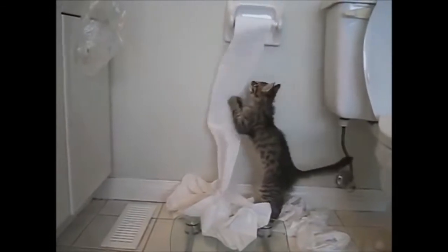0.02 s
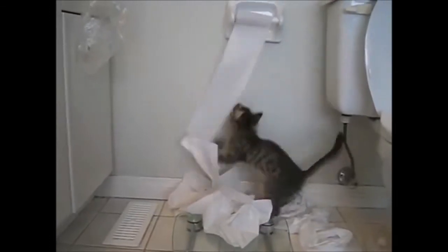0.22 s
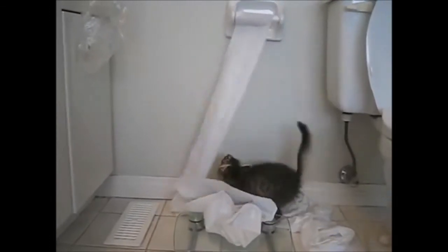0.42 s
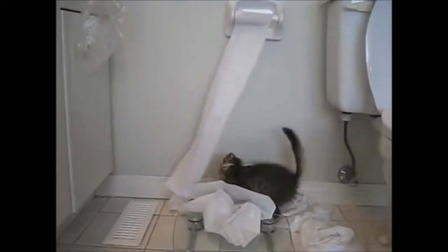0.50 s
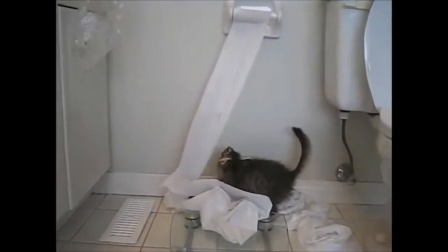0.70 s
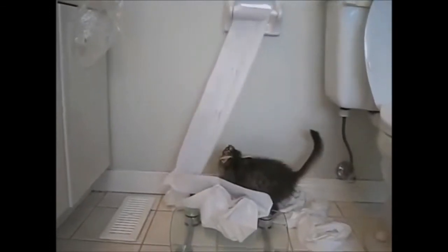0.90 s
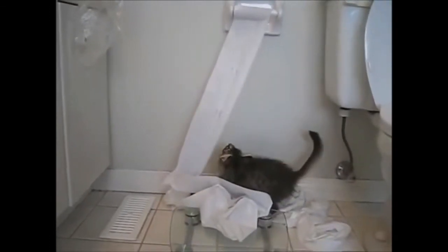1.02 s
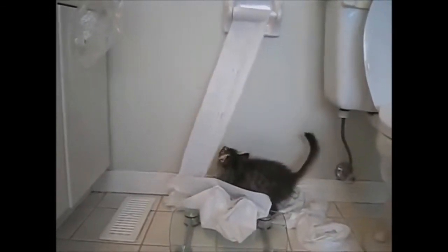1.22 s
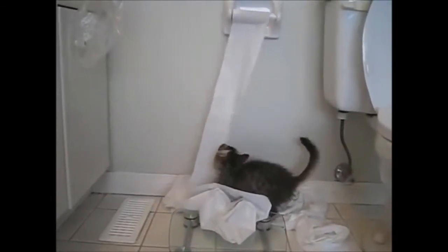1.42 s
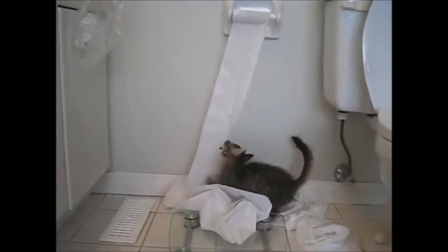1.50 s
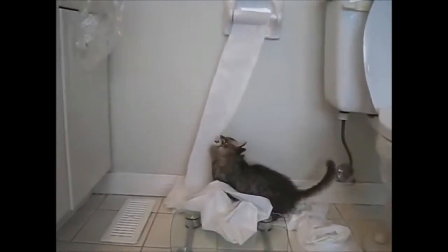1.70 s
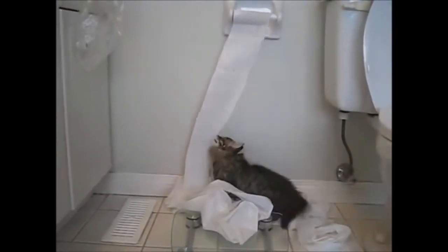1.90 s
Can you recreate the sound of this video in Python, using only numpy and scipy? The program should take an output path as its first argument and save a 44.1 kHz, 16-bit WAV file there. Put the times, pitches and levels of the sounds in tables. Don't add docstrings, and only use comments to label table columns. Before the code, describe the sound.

Quick hollow and hard clacks of a cardboard roll on its spindle, a burst of rustling paper and dull paw thuds, then low vent hum with slight paper crackles, in a small echoing bathroom on a small camera microphone.

```python
import sys
import numpy as np
from scipy import signal
from scipy.io import wavfile

SR = 44100
rng = np.random.default_rng(int(sys.argv[2]) if len(sys.argv) > 2 else 0)


def ratio(d):
    e = np.asarray(d, float) / 20
    return 10 ** e


def log_audio(samples):
    frames = np.atleast_2d(samples).T
    limited = np.clip(frames, -1, 1)
    pcm = np.round(limited * 32767).astype(np.int16)
    wavfile.write(sys.argv[1], SR, pcm)


N = 85995

# time [s], rustle level [dB], brightness [dB per octave].
CLAWED_MOTION = [
    (0, -47.5, -3.0),
    (.06, -54.5, -4),
    (.11, -45.5, -2.6),
    (.15, -43, 0.5),
    (.19, -42.5, -1.5),
    (.224, -46, 1.5),
]
# time [s], rustle level [dB], brightness [dB per octave].
YANKED_MOTION = [
    (.234, -37.5, -4.5),
    (.27, -38.5, 2),
    (0.294, -26.5, -0.65),
    (.35, -28.5, -0.1),
    (0.448, -33.5, 0.5),
    (0.474, -48, -2.5),
    (.68, -57.5, -0.5),
    (.72, -61, -1),
    (1.05, -96, 3.5),
]
# time [s], rustle level [dB], brightness [dB per octave].
SLACK_MOTION = [
    (1.215, -72.5, -0.24),
    (1.25, -52, 0.68),
    (1.27, -54.5, .6),
    (1.285, -49, 0.42),
    (1.325, -46, 0.58),
    (1.40, -60.5, -0.98),
    (1.5, -57.5, -1.1),
    (1.65, -58.5, -0.97),
    (1.95, -61, -.6),
]
# frequency [Hz], density [dB per Hz].
TAUT_COLOUR = [(88, -29), (150, -24), (601, -4), (790, -16), (960, -2.5), (1870, -6.5), (4000, -5),
               (12700, -15), (16000, -13)]
# frequency [Hz], density [dB per Hz].
SLACK_COLOUR = [(180, -44), (300, -20), (405, -6), (946, -4.5), (1320, -2.5), (4830, -4.5), (16000, -15)]
# time [s], peak [dB], pitch [Hz].
CREASE_SNAPS = [
    (1.168, -49.5, 1240),
    (1.28, -41, 3000),
    (1.483, -49, 3370),
    (1.621, -52, 3550),
    (1.631, -40, 4310),
    (1.693, -49.5, 2640),
    (1.848, -55, 1920),
]
# time [s], peak [dB], hollow-to-hard balance [dB],
# chatter length [s], hard ring [Hz].
ROLL_KNOCKS = [(.0005, -39, 1.5, 0.01, 4700), (0.0194, -31.5, -0.5, .004, 3880),
               (0.085, -23.5, 7, 0.0049, 4200), (0.097, -29, 11, 0.0014, 4000),
               (.131, -22.5, -8, 0.0035, 4050), (0.155, -30, -5, 0.0067, 3340),
               (0.185, -25.5, 4.5, 0.0034, 4300), (0.232, -22.5, -1, 0.0034, 4200),
               (0.235, -27, -0.5, 0.0024, 5000), (0.244, -21, 1.5, .004, 4950),
               (0.2607, -11, -2, .005, 3967), (0.279, -20, -2.5, 0.0051, 4580),
               (0.296, -20, -9.5, 0.0027, 4250), (0.3048, -10.5, -16, .003, 4040),
               (0.308, -13, -8, 0.0019, 2900), (0.3176, -14.5, -2.5, 0.0024, 4910),
               (0.337, -19, 2.5, 0.0046, 3500), (.345, -19.5, 3, 0.0039, 2950)]
# time [s], rattle level [dB].
ROLL_SPIN = [
    (0, -44.5),
    (.07, -47.5),
    (.1, -40),
    (.22, -48),
    (.24, -44),
    (.29, -34.5),
    (.33, -29),
    (.40, -33.5),
    (.50, -50),
]
# multiple of the hard ring, level [dB], t60 [s].
SPINDLE_MODES = [(.62, -11.5, .005), (.78, -19, .004), (1.001, -0.14, 0.015), (1.22, -3.5, .004),
                 (1.55, -8.5, .003), (2.1, -11, .002), (2.6, -15.5, 0.0022), (3.2, -30, .002)]
# frequency [Hz], level [dB], t60 [s].
TUBE_MODES = [(596, -10.5, 0.028), (960, -8.5, 0.042), (1086, -12, 0.029), (1335, -4.5, 0.034),
              (1404, -1.3, .04), (1738, -9, 0.044)]
# time [s], level [dB].
PAW_LANDINGS = [
    (.02, -54.5),
    (.10, -53),
    (0.199, -43.5),
    (.29, -39),
    (0.341, -43),
    (.39, -38.5),
    (0.459, -40.5),
    (.55, -47.5),
    (.74, -54),
]
# frequency [Hz], level [dB], t60 [s].
BOOM_MODES = [(96, -7.5, 0.14), (159.9, 0.8, 0.18), (213, -5.5, 0.11), (258, -6, 0.132), (419.7, -5, 0.12)]
# frequency [Hz], density [dB per Hz].
AIR_COLOUR = [(12, -41), (20, 7), (120, -5.5), (301, -5), (542, -12), (923, -7), (1440, -11), (7730, -18.5),
              (16000, -28.5)]
# frequency [Hz], width [Hz], level [dB rms].
VENT_TONES = [(306, 30, -67), (917.6, 40, -63.5), (1130, 53, -74.5), (7790, 35, -79.5)]

GRAINS_PER_S, GRAIN_SPREAD_DB, HISS_SHARE, PATCHY_DB = 5400, 2, 0.4, 2.5
CLUMP_DB, CLUMPS_PER_S = 2, 130
CREASE_CYCLES = 13
HOLLOW_DB, HARD_DB, TOUCHES_PER_S = -7.5, -2.5, 9000
BRIGHTER_DB_PER_DB = 0.7
TUBE_SOFT_HZ = 2200
KNOCK_FLOOR_HZ, KNOCK_TOP_HZ = 946, 12000
RATTLES_PER_S, RATTLE_SPREAD_DB, RATTLE_DB = 900, 2.2, -26.5
WOBBLE_DB_PER_DB = 0.7454
PAW_S, PAW_DB, PAW_FLOOR_HZ = .08, -24.5, 85
ROOM_T60_S, WALL_CUT_HZ, ROOM_DB, KNOCK_ROOM_DB = 0.44, 8950, -13, -5.5
AIR_DB, AIR_PATCHY_DB, VENT_WAVER_DB = -61.5, .4, .8


def rustle(motion, colour):
    level_db, bright_db = in_time(motion)
    fibres = [grains(GRAINS_PER_S, GRAIN_SPREAD_DB) + HISS_SHARE * rng.standard_normal(N) for _ in range(2)]
    clumped_db = level_db + CLUMP_DB * drift(CLUMPS_PER_S)
    return ratio(clumped_db) * banded(fibres, colour, PATCHY_DB, bright_db)


def creases():
    out = np.zeros(N)
    for s, db, hz in CREASE_SNAPS:
        click = np.zeros(N)
        click[int(s * SR)] = 1
        t60_s = CREASE_CYCLES / hz
        snap = ring(ring(click, hz, t60_s), hz, t60_s)
        out += ratio(db) * snap / snap.max()
    return out


def sheet():
    taut = rustle(CLAWED_MOTION + YANKED_MOTION, TAUT_COLOUR)
    slack = rustle(SLACK_MOTION, SLACK_COLOUR)
    return taut + slack + creases()


def knocks():
    out, span = np.zeros(N), SR // 8
    soften = signal.butter(2, TUBE_SOFT_HZ, fs=SR, output="sos")
    for s, db, hollow_db, length_s, ring_hz in ROLL_KNOCKS:
        touches = rng.choice([-1, 1], span) * (rng.random(span) < TOUCHES_PER_S / SR)
        chatter = touches * hump(0, length_s)[:span]
        soft = signal.sosfilt(soften, chatter)
        hard = np.zeros(span)
        for multiple, mode_db, t60_s in SPINDLE_MODES:
            brighter_db = BRIGHTER_DB_PER_DB * (db + 11) * max(multiple - 1, 0)
            hard += struck(chatter, multiple * ring_hz, mode_db + brighter_db, t60_s)
        hollow = sum(struck(soft, hz, mode_db, t60_s) for hz, mode_db, t60_s in TUBE_MODES)
        hard_gain = ratio(db - max(2 * hollow_db, 0) + HARD_DB)
        hollow_gain = ratio(db + min(2 * hollow_db, 0) + HOLLOW_DB)
        start = int(s * SR)
        out[start:start + span] += hard_gain * hard + hollow_gain * hollow
    band = signal.butter(2, [KNOCK_FLOOR_HZ, KNOCK_TOP_HZ], "band", fs=SR, output="sos")
    return signal.sosfilt(band, out)


def spin():
    stop = (ROLL_SPIN[-1][0] + 0.087, -90)
    spin_db, = in_time(ROLL_SPIN + [stop])
    rattle = np.zeros(N)
    for hz, db, t60_s in TUBE_MODES:
        wobble_db = WOBBLE_DB_PER_DB * (spin_db + 41) * np.log2(1400 / hz)
        clicks = ratio(db + wobble_db) * grains(RATTLES_PER_S, RATTLE_SPREAD_DB)
        rattle += ring(clicks, hz, t60_s)
    return ratio(spin_db + RATTLE_DB) * rattle


def paws():
    weight = sum(ratio(db + PAW_DB) * hump(s, PAW_S) for s, db in PAW_LANDINGS)
    boom = np.zeros(N)
    for hz, db, t60_s in BOOM_MODES:
        scuff = ratio(db) * weight * rng.standard_normal(N)
        boom += ring(scuff, hz, t60_s)
    return signal.sosfilt(signal.butter(2, PAW_FLOOR_HZ, "high", fs=SR, output="sos"), boom)


def bathroom(x):
    out, dull = np.zeros(N), np.exp(-2 * np.pi * WALL_CUT_HZ / SR)
    lags = (rng.uniform(.007, .03, 12) * SR).astype(int)
    for k, lag in enumerate(lags):
        loop, state = x.copy(), [0.]
        gain = np.exp(-np.log(1000) * lag / SR / ROOM_T60_S)
        for i in range(lag, N, lag):
            back, state = signal.lfilter([gain * (1 - dull)], [1, -dull], loop[i - lag:i], zi=state)
            loop[i:i + lag] += back[:N - i]
        out += (loop - x) * (-1) ** k
    return out


def vent():
    out = np.zeros(N)
    for hz, width_hz, db in VENT_TONES:
        t60_s = np.log(1000) / (np.pi * width_hz)
        tone = rms_one(ring(rng.standard_normal(N), hz, t60_s))
        out += ratio(db + VENT_WAVER_DB * drift(2.5)) * tone
    return out


def air():
    return ratio(AIR_DB) * banded(rng.standard_normal((2, N)), AIR_COLOUR, AIR_PATCHY_DB)


def hump(s, length_s):
    u = np.clip((np.arange(N) / SR - s) / length_s, 0, 1)
    return np.sqrt(u) * (1 - u)


def ring(clicks, hz, t60_s):
    r, w = np.exp(-np.log(1000) / (t60_s * SR)), 2 * np.pi * hz / SR
    return signal.lfilter([0, np.sin(w)], [1, -2 * r * np.cos(w), r * r], clicks + 1e-18)


def struck(chatter, hz, db, t60_s):
    rung = ring(chatter, hz, t60_s)
    return ratio(db) * rung / np.abs(rung).max()


def grains(per_s, spread_db):
    sizes = ratio(spread_db * np.minimum(rng.exponential(1, N), 4)) * rng.choice([-1, 1], N)
    return rms_one(sizes * (rng.random(N) < per_s / SR))


def banded(sources, spectrum, patchy_db, tilt_db=0):
    out, together = 0, drift(25)
    edges_hz = 20 * 2 ** np.arange(0, 9.9, .4)
    hz_at, db_at = np.transpose(spectrum)
    for k, (low, high) in enumerate(zip(edges_hz, edges_hz[1:])):
        band = signal.sosfilt(signal.butter(2, [low, high], "band", fs=SR, output="sos"), sources[k % 2])
        hz = np.sqrt(low * high)
        db = np.interp(np.log(hz), np.log(hz_at), db_at) + tilt_db * np.log2(hz / 3000)
        flicker_db = patchy_db * (0.28 * together + drift(36))
        out = out + ratio(db + flicker_db) * band
    return rms_one(out)


def drift(rate_hz):
    r = np.exp(-80 * np.pi * rate_hz / SR)
    noise = rng.standard_normal(N // 40 + 2002)
    slow = signal.lfilter([1], [1, -2 * r, r * r], noise)[2000:]
    return np.interp(np.arange(N) / 40, np.arange(len(slow)), rms_one(slow))


def in_time(rows):
    s, *columns = np.transpose(rows)
    return [np.interp(np.arange(N) / SR, s, column) for column in columns]


def rms_one(x):
    return x / np.sqrt(np.mean(x ** 2) + 1e-20)


def scene():
    paper = sheet()
    roll = knocks() + spin()
    room = ratio(ROOM_DB) * bathroom(paper + ratio(KNOCK_ROOM_DB) * roll)
    return (paper + roll + room + paws() + vent() + air())[None]


def top_cut(x):
    return signal.sosfilt(signal.butter(12, 16300, fs=SR, output="sos"), x)


def record(dry):
    mix = signal.sosfilt(signal.butter(2, 45, "high", fs=SR, output="sos"), dry)
    mix = signal.sosfilt(signal.cheby2(16, 40, 16000, fs=SR, output="sos"), mix)
    return top_cut(mix)


dry = scene()
out = record(dry)
log_audio(out)
```